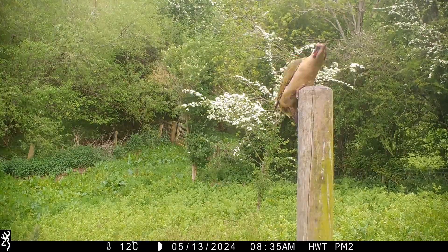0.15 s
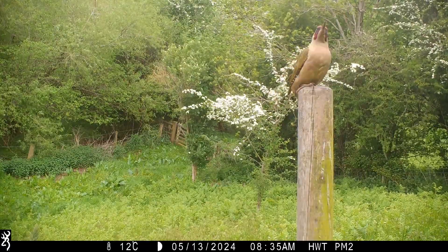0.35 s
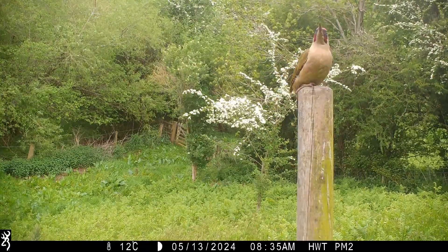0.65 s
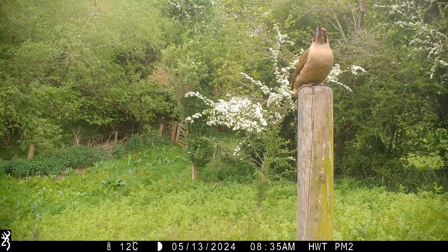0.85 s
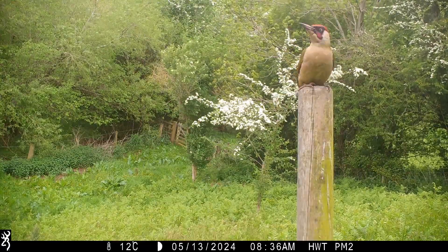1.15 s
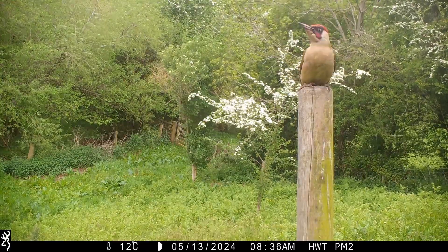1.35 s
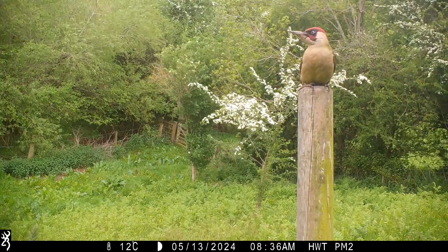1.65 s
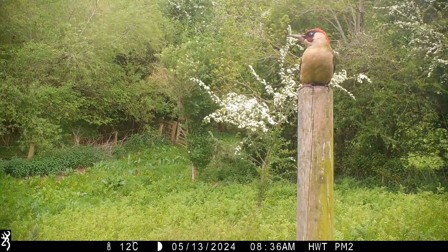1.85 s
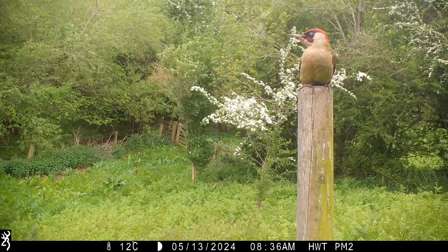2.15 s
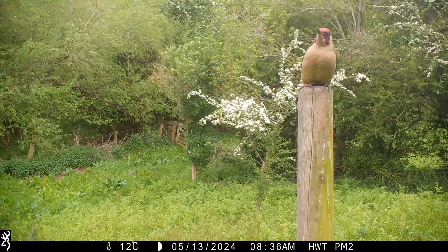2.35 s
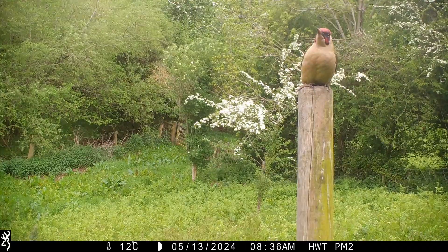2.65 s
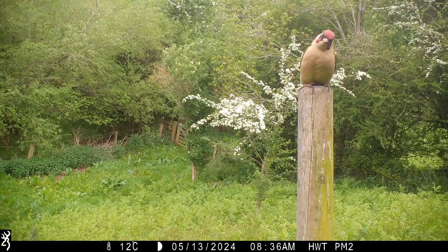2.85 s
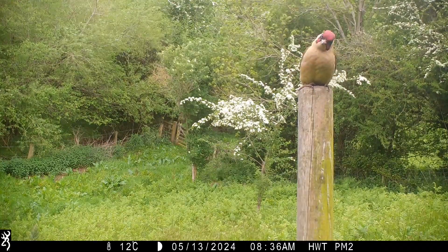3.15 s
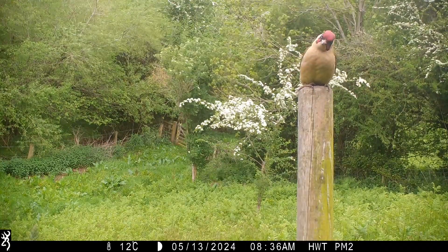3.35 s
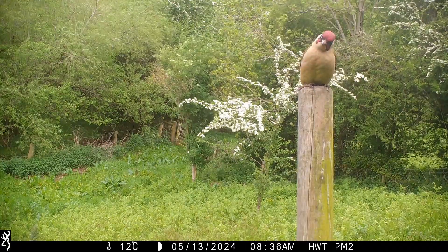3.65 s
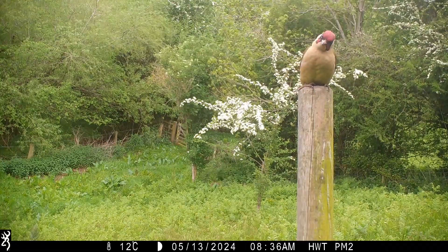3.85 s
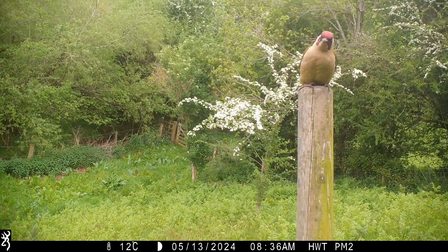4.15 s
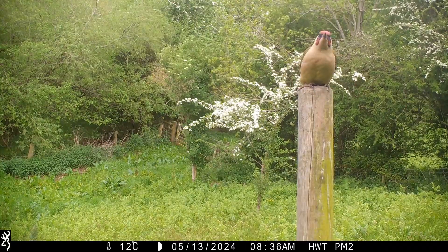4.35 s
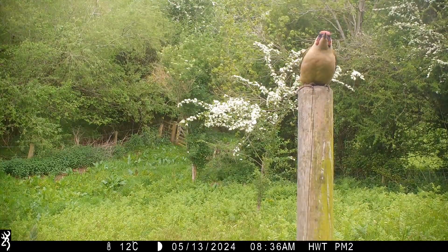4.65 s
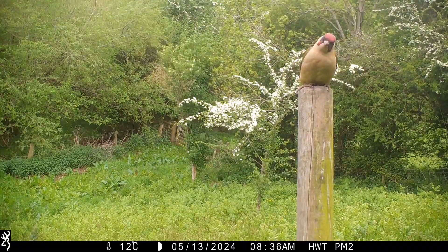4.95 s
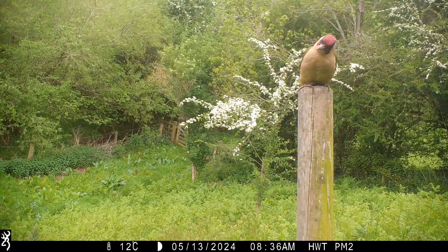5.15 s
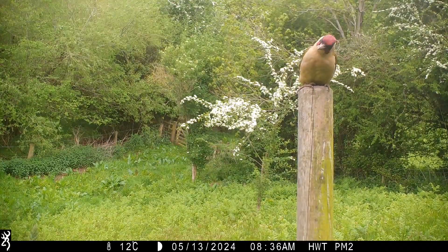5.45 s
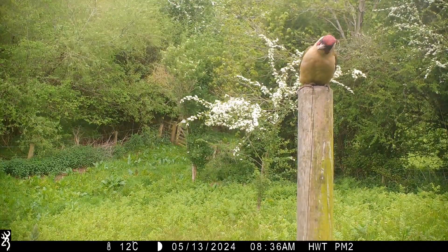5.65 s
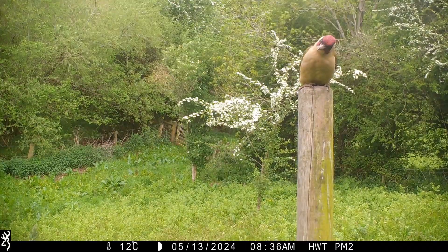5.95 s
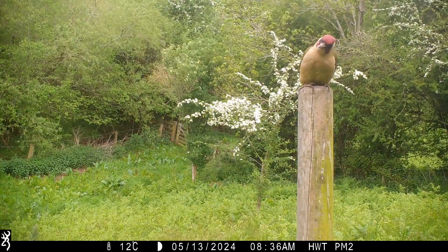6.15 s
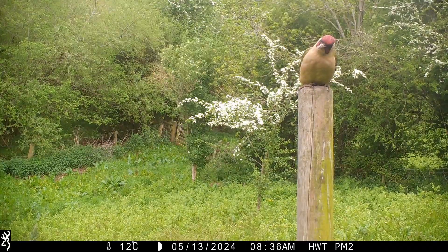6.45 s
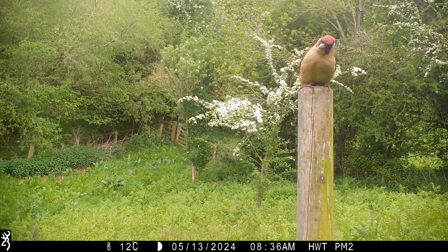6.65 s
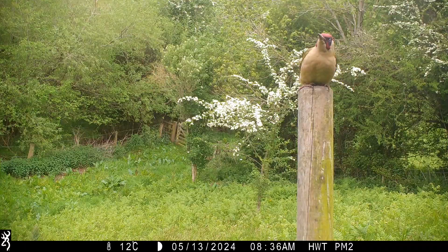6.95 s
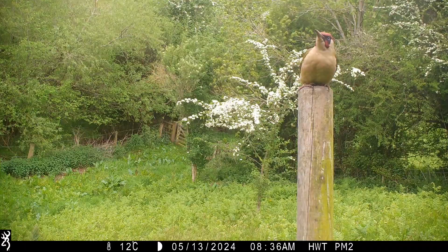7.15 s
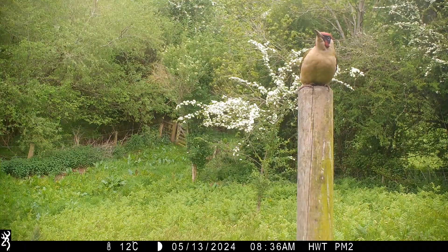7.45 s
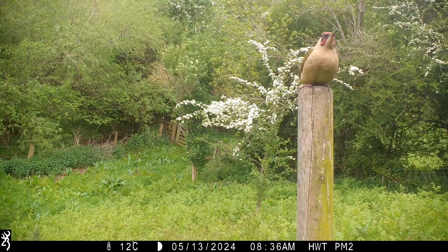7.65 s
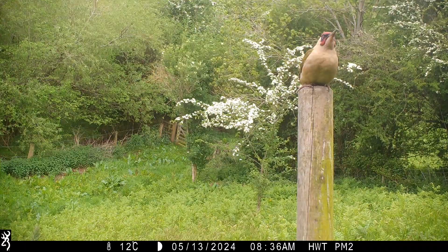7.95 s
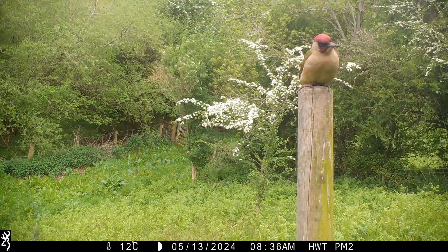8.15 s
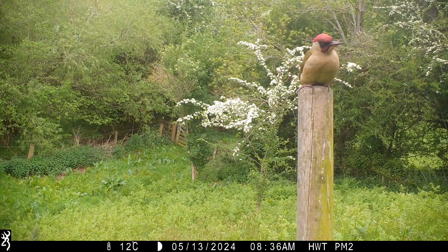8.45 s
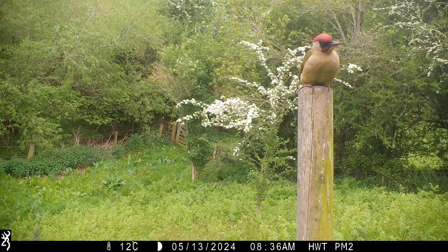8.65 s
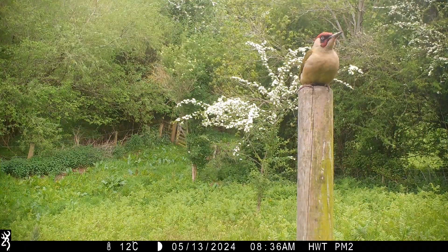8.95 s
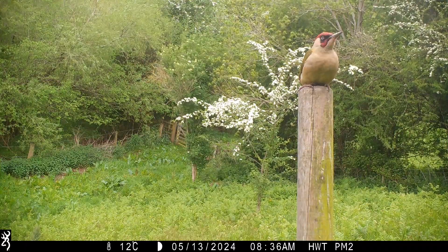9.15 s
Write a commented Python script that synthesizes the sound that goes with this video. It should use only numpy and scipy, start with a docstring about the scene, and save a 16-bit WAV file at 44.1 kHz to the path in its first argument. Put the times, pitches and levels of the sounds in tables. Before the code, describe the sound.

Three sharp, slightly hoarse woodpecker cries ring out close by, followed by faint small birds and a far thrush singing in quiet trees.

```python
"""Trees hush and a trail camera whines thinly throughout. First a pigeon coos far away, claws tick on a
fence post and distant birds cry. After a second, a green woodpecker on the post gives three loud, quick
"kyu" notes, each turning hoarse as its voice box slackens; the wood behind echoes faintly. Small birds
twitter and chirp. From about four seconds a song thrush further off whistles repeated phrases, then
warbles. A few faint chirps come last."""
import sys
import numpy as np
from scipy import signal
from scipy.fft import rfft, irfft
from scipy.io import wavfile
from scipy.ndimage import map_coordinates

SR = 44100
rng = np.random.default_rng(int(sys.argv[2]) if len(sys.argv) > 2 else 0)


def store_pcm(level_fs):
    """Save levels as 16-bit WAV."""
    pcm = np.round(np.clip(level_fs, -1, 1) * 32767).astype(np.int16)
    wavfile.write(sys.argv[1], SR, np.atleast_2d(pcm).T)


N = 410130

# tone colour of the air in the trees: (frequency [Hz], relative level [dB])
HUSH_COLOUR = [(15, -48), (25, -18.5), (43, -12.5), (76, -14), (98, -13), (290, -5.5), (404, -3.5),
               (465, -2.5), (1140, -1.5), (1340, -3.5), (1440, -4), (2010, -6), (3790, -19.5),
               (4370, -26.5), (7000, -43), (9100, -74.5), (15400, -120)]
# slow swell of that hush: (time [s], level [dB])
HUSH_SWELL = [(0, -52.5), (1.0, -52), (2.2, -53), (4.0, -53), (6.0, -53.5), (7.8, -53.5), (9.3, -54)]
# steady tones of the camera's electronics: (frequency [Hz], level [dB])
WHINE_TONES = [(50, -78), (7766, -83), (7826, -83.5)]
# far pigeon coos: (time [s], length [s], first pitch [Hz], middle pitch [Hz], last pitch [Hz], level [dB])
PIGEON_COOS = [(.14, .2, 400, 425, 400, -61), (.6, .26, 400, 425, 405, -61),
               (1.86, .19, 405, 430, 405, -58), (2.6, .17, 405, 425, 405, -58.5)]
# drawn-out cries of far birds: columns as for the coos
FAR_CRIES = [(.45, 0.515, 1383, 1368, 1286, -65), (.45, 0.6, 2030, 1921, 1884, -64.5),
             (2.92, 0.4, 1388, 1371, 1302, -58.5)]
# single chirps of small birds, plus two upper notes of the thrush: columns as for the coos
SINGLE_CHIRPS = [(.745, 0.06, 2850, 2708, 2584, -64.5), (.785, 0.0893, 5014, 4880, 4880, -66),
                 (1.935, .097, 5900, 5888, 5910, -79), (2.068, 0.0516, 4074, 3672, 3456, -62.5),
                 (2.115, 0.0435, 3300, 2948, 3000, -56.5), (3.005, 0.0923, 5070, 4344, 4115, -59),
                 (3.64, .05, 5000, 5370, 5670, -74.5), (4.025, 0.117, 6080, 5280, 4705, -75),
                 (4.298, .043, 2980, 3358, 3600, -55), (4.459, 0.0241, 3900, 3150, 3160, -47),
                 (7.42, 0.07, 3310, 3816, 4220, -64.5), (7.95, 0.084, 3950, 4460, 4970, -70.5),
                 (9.13, 0.0532, 3406, 2917, 2800, -64.5), (9.19, 0.136, 4250, 4100, 4036, -75)]
# twitter deep in the wood:
# (from [s], to [s], rate [notes/s], lowest start [Hz], highest start [Hz], level [dB])
TWITTER_SPELLS = [(1.85, 2.561, 75, 3393, 4777, -68), (8.798, 9.283, 40, 3400, 4582, -84)]
# small birds repeating a falling note: (first start [s], last start [s], notes [count], length [s],
# first pitch [Hz], middle pitch [Hz], last pitch [Hz], level [dB], change over run [dB], sinking [Hz])
NOTE_RUNS = [(2.121, 2.625, 5, .046, 5620, 4338, 3237, -60.5, -4.5, 0.5),
             (4.186, 4.832, 8, 0.0341, 5430, 4572, 4420, -64.5, -1, 0),
             (8.82, 9.029, 4, 0.0447, 5850, 5616, 5505, -82.5, 9, 1400)]
# claws on the post: (time [s], level [dB], top of the noise band [Hz], decay [s])
CLAW_TICKS = [(.214, -36.5, 2610, 0.0075), (.32, -32.5, 3861, 0.00295)]
# shape of each thrush syllable, by name: (time into it [s], pitch [Hz], relative level [dB])
THRUSH_SYLLABLES = { "drop": [(0, 3047, -11), (.022, 2632, -1.5), (.036, 2450, -2.5), (.06, 2052, -11)],
                    "rise": [(0, 1956, -14.5), (.04, 2444, -9.5), (.07, 2670, 1), (.088, 2800, -3),
                    (.108, 2767, -22)], "tu": [(0, 2005, -10), (.014, 2368, -7), (.03, 2654, -1),
                    (.046, 2400, -2.5), (.062, 2107, -6.5)], "twee": [(0, 2192, -13.5), (.016, 2532, -8.5),
                    (.021, 2866, 1), (.035, 3069, -3), (.07, 3122, -2.5), (.098, 3104, 0),
                    (.11, 2598, -1.5), (.127, 2384, 0), (.148, 2366, -16)], }
# thrush song: (time [s], syllable [name], time stretch [factor], level [dB], waver [share of pitch])
THRUSH_SONG = [(4.172, "drop", 1.066, -49, .02), (4.289, "rise", 0.959, -40, .005),
               (4.458, "drop", 0.36, -47, .01), (4.71, "tu", 1.114, -43.5, 0.016),
               (4.837, "twee", 1.06, -44.5, 0.0056), (5.209, "tu", 0.967, -42.5, .015),
               (5.342, "twee", 0.97, -41.5, 0.0048), (5.771, "tu", 0.91, -43, 0.0145),
               (5.905, "twee", 1.012, -43.5, 0.0102)]
# thrush warbles:
# (time [s], length [s], start pitch [Hz], settling [s], quaver depth [Hz], quaver time [s], level [dB])
THRUSH_WARBLES = [(6.409, 0.1633, 2903, 0.0426, 140.8, 0.0682, -47.5),
                  (6.708, 0.1454, 3050, 0.0515, 219.3, 0.1266, -44.5),
                  (7.27, 0.148, 3035, 0.035, 200, 0.061, -49),
                  (7.526, 0.164, 3070, 0.0464, 210, 0.1265, -45.5)]
# how the woodpecker's throat and open bill shape the overtones: (frequency [Hz], relative level [dB])
THROAT_COLOUR = [(1200, -9), (1700, 6), (2300, 1), (2950, 1.5), (3350, -13.5), (3650, -22.5), (3950, -27),
                 (4400, -24), (5200, -33.5), (6000, -38.5), (7000, -58), (9000, -72)]
# air rasping in its throat: (frequency [Hz], relative level [dB])
RASP_COLOUR = [(500, -22.5), (1000, -2), (2000, 17), (3000, 10.5), (4500, 1.5), (6000, -35.5),
               (7500, -36.5), (12000, -43), (15000, -62.5)]
# crackle as a note overloads the camera: (frequency [Hz], relative level [dB])
CRACKLE_COLOUR = [(25, 6.5), (100, 4.5), (200, 3), (500, -3.5), (900, -5), (4000, -12), (7000, -20.5),
                  (11500, -24), (15000, -39)]
# shrill edge of that overload, for 5 to 10 times the pitch: (level [dB])
SHRILL_LEVELS = [-38.5, -36.5, -51.5, -51.5, -50, -52.5]
# woodpecker notes: (time [s], length [s], soft lead-in [s], attack [s], release [s], time of top [s],
# top pitch [Hz], fall time [s], second-half level [dB], time of voice break [s], its roughness [0-1])
KYU_NOTES = [(1.094, 0.11335, .003, .017, 0.0387, .032, 1479, .030, -5, .084, 0.2),
             (1.266, 0.11204, .008, 0.008, 0.0415, 0.02637, 1484, 0.03135, -5.5, 0.095, 0.15),
             (1.465, 0.1055, 0.00776, .008, 0.0389, .028, 1476, .022, -8, .076, .12)]

# a woodpecker note arches up, settles on a ledge and collapses by COLLAPSE_HZ at the end
START_HZ, LEDGE_HZ, FALL_CURVE = 836.8, 1115, 1.8
COLLAPSE_S, COLLAPSE_HZ, COLLAPSE_CURVE = 0.032, 520, 1.7
# its loudness: soft lead-in, full cry, dying away
LEAD_DB, CRY_DB, RELEASE_DB, RELEASE_CURVE = -31, -4, 35, 1.9
# past the top the note briefly dips and dulls while its base (lowest) tone swells, then both recover
DIP_DELAY_S, DIP_TAKES_S, RECOVERY_S = .0105, 0.0034, .019
DIP_DB, DIP_DULL_DB, DIP_BASE_DB = 5, 6, 8
# the base tone is weak, weaker in a slack voice box, and returns in a grunt as the pitch collapses
BASE_DB, SLACK_LOSS_DB, GRUNT_HZ, GRUNT_DB = -10.5, 4, 867, 8
# the voice is bright and rasps as it catches, and rasps again where it breaks
CATCH_S, CATCH_BRIGHT_DB, CATCH_ROUGH, BREAK_S = 0.0074, 7.5, .16, .008


def from_db(db):
    """Turn decibels into a volume factor."""
    return 10 ** (np.asarray(db) / 20)


def rms_one(x):
    """Scale a sound to an average power of 1."""
    return x / np.sqrt(np.mean(x ** 2) + 1e-20)


def ramp(x):
    """Hold a share between 0 and 1."""
    return np.clip(x, 0, 1)


def below(pitch, hz, width_hz):
    """Smooth switch: 1 under the given pitch, 0 above it."""
    return 1 / (1 + np.exp(np.clip((pitch - hz) / width_hz, -30, 30)))


def at_hz(colour, hz):
    """Look up the level of a tone colour at a frequency."""
    f, db = np.transpose(colour)
    return np.interp(np.log(np.maximum(hz, 1)), np.log(f), db)


def noise(colour, size):
    """Noise with the given tone colour."""
    hz = np.arange(size // 2 + 1) * SR / size
    return rms_one(irfft(rfft(rng.standard_normal(size)) * from_db(at_hz(colour, hz)), size))


def drift(rate, size):
    """A smooth random wobble with about `rate` turns a second."""
    at = np.arange(size) * rate / SR
    return map_coordinates(rng.standard_normal(4096), [at], order=3, mode="wrap")


def fade(size, edge_s):
    """Soft opening and closing of a note."""
    n = np.arange(size)
    return np.sin(np.pi / 2 * ramp(np.minimum(n, n[::-1]) / (edge_s * SR)))


def add(out, s, x):
    """Mix a sound in at time s."""
    i = int(np.clip(round(s * SR), 0, N))
    out[i:i + len(x)] += x[:N - i]


def background(hiss_db=-84):
    """Air in the far trees, and the camera's own whine and hiss."""
    t = np.arange(N) / SR
    hush = noise(HUSH_COLOUR, N) * from_db(np.interp(t, *np.transpose(HUSH_SWELL)) + 0.27 * drift(6, N))
    whine = sum(np.sqrt(2) * from_db(db) * np.sin(2 * np.pi * hz * t) for hz, db in WHINE_TONES)
    return hush + whine + from_db(hiss_db) * rng.standard_normal(N)


def wood_echo(x, near_db, tail_db, tail_s, near_s=.012, low_hz=400, dull_hz=4500):
    """Add a quick scatter from ground and leaves, then a long dull echo from the trunks."""
    t = np.arange(SR) / SR
    near = rng.standard_normal(SR) * np.exp(-t / near_s) * (t > .002)
    tail = rng.standard_normal(SR) * from_db(-60 * t / tail_s) * (1 - np.exp(-t / .025))
    tail = signal.sosfilt(signal.butter(2, [low_hz, dull_hz], "band", fs=SR, output="sos"), tail)
    echo = (from_db(near_db) * rms_one(near) + from_db(tail_db) * rms_one(tail)) / np.sqrt(SR)
    return x + signal.fftconvolve(x, echo)[:N]


def whistle(pitch, level_db, edge_s, waver=0.0065, flutter_db=-2.0):
    """A nearly pure bird tone, slightly unsteady."""
    size = len(pitch)
    phase = 2 * np.pi * np.cumsum(pitch * (1 + waver * drift(200, size))) / SR
    volume = np.sqrt(2) * from_db(level_db + flutter_db * drift(120, size))
    return volume * np.sin(phase) * fade(size, edge_s)


def glides(notes, edge_share, air_db_per_khz=6.0):
    """Bird notes that each bend through three pitches."""
    out = np.zeros(N)
    for s, length, first, middle, last, db in notes:
        along = np.linspace(0, 1, int(length * SR))
        pitch = np.polyval(np.polyfit([0, .5, 1], [first, middle, last], 2), along)
        air_loss_db = air_db_per_khz * (pitch - middle) / 1000  # air takes more from high pitches
        add(out, s, whistle(pitch, db - air_loss_db, edge_s=edge_share * length))
    return out


def pigeon():
    """Soft, low coos that rise and fall a little."""
    return glides(PIGEON_COOS, edge_share=0.296)


def twitter(length_s=0.02949, drop_hz=800, spread_db=7):
    """Quick falling notes scattered at random, too far off to tell apart."""
    notes = []
    for begin, end, per_s, low_hz, high_hz, db in TWITTER_SPELLS:
        for when, high, fall, strong in rng.random((int(per_s * (end - begin)), 4)):
            s = begin + when * (end - begin)
            hz = low_hz + high * (high_hz - low_hz)
            drop = drop_hz * (.5 + fall)
            notes.append((s, length_s, hz, hz - drop / 2, hz - drop, db + spread_db * (strong - .5)))
    return glides(notes, edge_share=0.262)


def chirp_runs(uneven_db=1.5):
    """A small bird repeats one note at an even pace; level and pitch can slide over the run."""
    notes = []
    for first_s, last_s, count, length, *hz, db, change_db, sink_hz in NOTE_RUNS:
        for along in np.linspace(0, 1, count):
            s = first_s + along * (last_s - first_s)
            level_db = db + along * change_db + uneven_db * rng.standard_normal()
            notes.append((s, length, *(np.array(hz) - along * sink_hz), level_db))
    return glides(notes, edge_share=0.23)


def claws():
    """Short scratches on dry wood, each a burst of noise."""
    out, t = np.zeros(N), np.arange(SR // 20) / SR
    for s, db, top_hz, decay in CLAW_TICKS:
        burst = rng.standard_normal(len(t)) * np.exp(-t / decay)
        band = signal.butter(3, [top_hz * 0.41, top_hz], "band", fs=SR, output="sos")
        add(out, s, from_db(db) * signal.sosfilt(band, burst))
    return out


def thrush_phrases():
    """The thrush whistles its syllables, each at its own pace, strength and waver."""
    out = np.zeros(N)
    for s, name, stretch, db, waver in THRUSH_SONG:
        times, pitches, levels = np.transpose(THRUSH_SYLLABLES[name])
        times = times * stretch
        t = np.arange(0, times[-1], 1 / SR)
        pitch = np.interp(t, times, pitches)
        add(out, s, whistle(pitch, db + np.interp(t, times, levels), edge_s=0.0032, waver=waver))
    return out


def thrush_warbles(held_hz=2618.5, quaver_hz=40.75, first_crest_s=0.0211, throb_db=2.0):
    """Notes that quaver down onto a held pitch, loudest at the bottom of each quaver."""
    out = np.zeros(N)
    for s, length, from_hz, settle_s, depth_hz, quaver_s, db in THRUSH_WARBLES:
        t = np.arange(int(length * SR)) / SR
        quaver = np.cos(2 * np.pi * quaver_hz * (t - first_crest_s)) * np.exp(-(t / quaver_s) ** 4)
        pitch = held_hz + (from_hz - held_hz) * np.exp(-(t / settle_s) ** 2) + depth_hz * quaver
        add(out, s, whistle(pitch, db - throb_db * (1 + quaver), edge_s=0.0267, waver=0.01488))
    return out


def kyu_pitch(t, length, top_s, top_hz, fall_s):
    """An arch up to the top, a fall to the ledge, a last collapse."""
    rise = START_HZ + (top_hz - START_HZ) * np.sin(np.pi / 2 * t / top_s)
    fall = LEDGE_HZ + (top_hz - LEDGE_HZ) * np.exp(-np.abs((t - top_s) / fall_s) ** FALL_CURVE)
    collapse = COLLAPSE_HZ * ramp(1 - (length - t) / COLLAPSE_S) ** COLLAPSE_CURVE
    return np.where(t < top_s, rise, fall) - collapse


def kyu_loudness(t, length, lead_s, attack_s, release_s):
    """A note starts softly, swells, holds and dies away; in dB, with 0 as the full cry."""
    lead = from_db(LEAD_DB - CRY_DB)
    attack = lead + (1 - lead) * np.sin(np.pi / 2 * ramp((t - lead_s) / attack_s)) ** 2
    return 20 * np.log10(attack) - RELEASE_DB * ramp(1 - (length - t) / release_s) ** RELEASE_CURVE


def kyu(length, lead_s, attack_s, release_s, top_s, top_hz, fall_s, late_db, break_s, break_rough,
        slack_hz=1150, shimmer=.02, slack_shimmer=0.25, waver=0.0073, slack_waver=0.014,
        rasp_db=-41, slack_rasp_db=-21, shrill_hz=1400, crackle_db=-32):
    """One clear note, strongest at twice its pitch, that turns hoarse as the voice box slackens."""
    size = int(length * SR)
    t = np.arange(size) / SR
    pitch = kyu_pitch(t, length, top_s, top_hz, fall_s)
    slack = below(pitch, slack_hz, width_hz=35)
    past_top = ramp((t - top_s - DIP_DELAY_S) / DIP_TAKES_S)
    dip = past_top * np.exp(-((t - top_s - DIP_DELAY_S - DIP_TAKES_S) / RECOVERY_S) ** 2)
    level_db = CRY_DB + (past_top - dip) * (late_db - CRY_DB) - DIP_DB * dip
    level_db += kyu_loudness(t, length, lead_s, attack_s, release_s)
    catch = np.exp(-((t - lead_s - attack_s * .6) / CATCH_S) ** 2)
    bright_db = CATCH_BRIGHT_DB * catch - DIP_DULL_DB * dip
    broken = CATCH_ROUGH * catch + break_rough * np.exp(-((t - break_s) / BREAK_S) ** 2)
    # the voice: a base tone, plus overtones at 2 to 6 times its pitch
    pitch = pitch * (1 + (waver + slack_waver * slack) * drift(700, size))
    phase = 2 * np.pi * np.cumsum(pitch) / SR
    grunt_db = GRUNT_DB * below(pitch, GRUNT_HZ, width_hz=50)
    voice = from_db(BASE_DB + DIP_BASE_DB * dip - SLACK_LOSS_DB * slack + grunt_db) * np.sin(phase)
    reference_db = at_hz(THROAT_COLOUR, 2 * np.maximum(pitch, LEDGE_HZ))
    for k in range(2, 7):
        colour = from_db(at_hz(THROAT_COLOUR, k * pitch) - reference_db + bright_db * (k > 2))
        flicker = 1 + (shimmer + slack_shimmer * slack + broken) * k / 4 * drift(600, size)
        voice += colour * flicker * np.cos(k * phase)
    # air escapes once in each cycle
    air = from_db(rasp_db) + from_db(slack_rasp_db) * slack + broken
    voice += air * noise(RASP_COLOUR, size) * (1 + 0.34 * np.sin(phase))
    # at its loudest and highest the note overloads the camera, adding a shrill edge and crackle
    overload = ramp((pitch - shrill_hz) / 160 + .6) * ramp((level_db + 12) / 4)
    shrill = sum(from_db(db + 2.5 * drift(300, size)) * np.sin(k * phase)
                 for k, db in enumerate(SHRILL_LEVELS, 5))
    loud = ramp((level_db + 10.5) / 4) * (1 - past_top) * (1 - slack)
    crackle = from_db(crackle_db) * noise(CRACKLE_COLOUR, size) * from_db(3.3 * drift(200, size))
    crackle *= 0.76 * np.sqrt(overload) + 0.6 * loud + 0.08 * dip
    return (from_db(level_db) * voice + overload * shrill + crackle) * fade(size, edge_s=0.0011)


def woodpecker():
    """Three "kyu" notes in a row."""
    out = np.zeros(N)
    for s, *note in KYU_NOTES:
        add(out, s, kyu(*note))
    return out


def scene(right_db=1.28):
    """The woodpecker's call sits a little to the right; everything else lies in the middle."""
    call = wood_echo(woodpecker(), near_db=-33.5, tail_db=-39, tail_s=.8, low_hz=1702, dull_hz=6040)
    song = thrush_phrases() + thrush_warbles()
    song = wood_echo(song, near_db=-4.5, tail_db=-16.0, tail_s=0.756, near_s=0.0158)
    small_sounds = glides(SINGLE_CHIRPS, edge_share=.3) + chirp_runs() + claws()
    small_sounds = wood_echo(small_sounds, near_db=-6.5, tail_db=-15, tail_s=0.64, near_s=0.01)
    far_birds = glides(FAR_CRIES, edge_share=0.14) + twitter()
    far_birds = wood_echo(far_birds, near_db=-20, tail_db=-11, tail_s=0.95)
    left_right = from_db([[-right_db / 2], [right_db / 2]])
    return call * left_right + song + small_sounds + far_birds + pigeon() + background()


def record(dry, cutoff_hz=15500):
    """The highest treble is cut off steeply."""
    return signal.sosfilt(signal.ellip(10, .2, 80, cutoff_hz, fs=SR, output="sos"), dry)


dry = scene()
out = record(dry)
store_pcm(out)
```